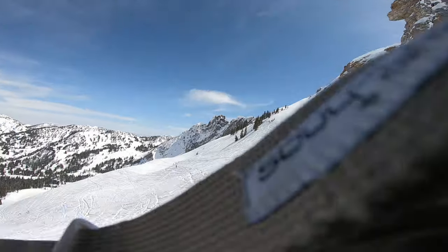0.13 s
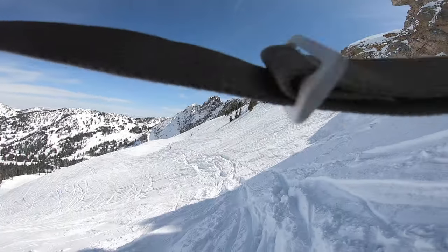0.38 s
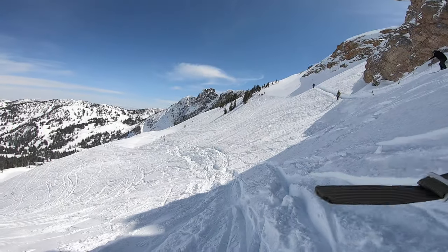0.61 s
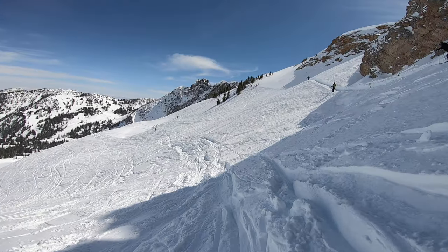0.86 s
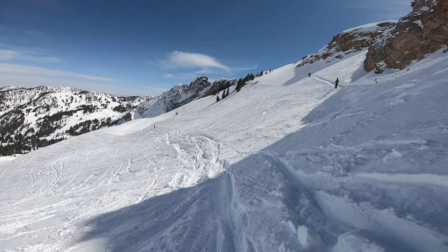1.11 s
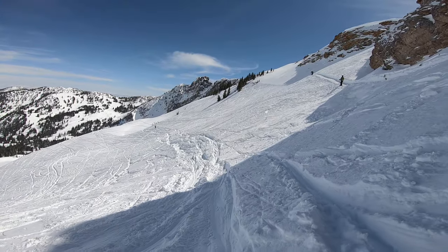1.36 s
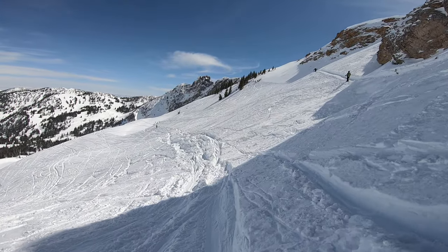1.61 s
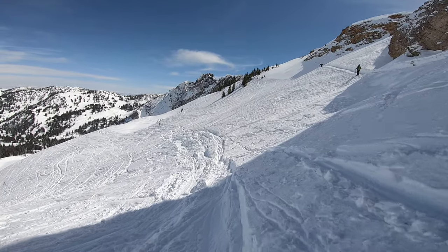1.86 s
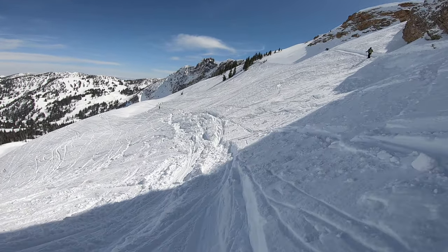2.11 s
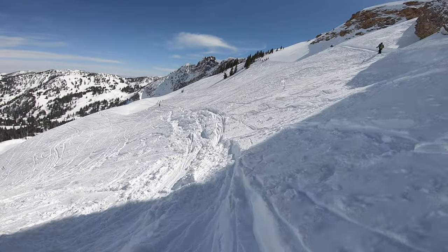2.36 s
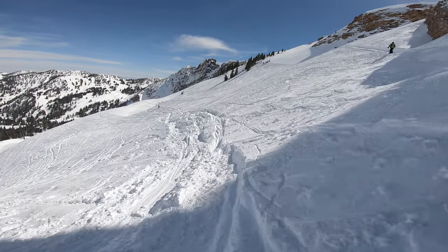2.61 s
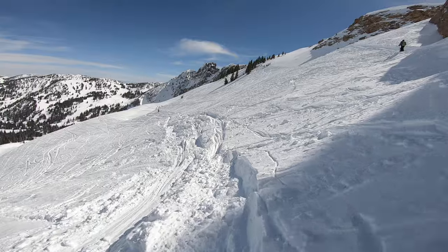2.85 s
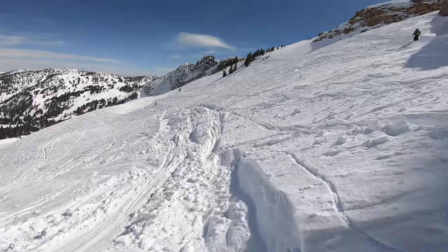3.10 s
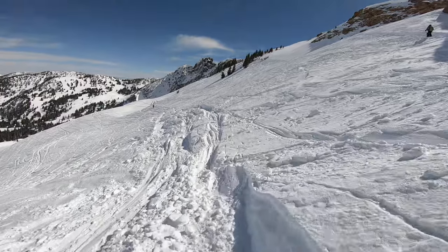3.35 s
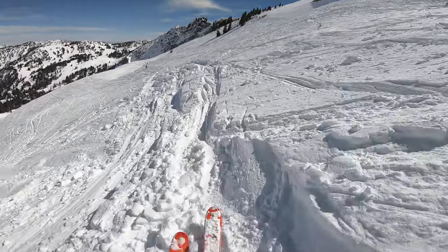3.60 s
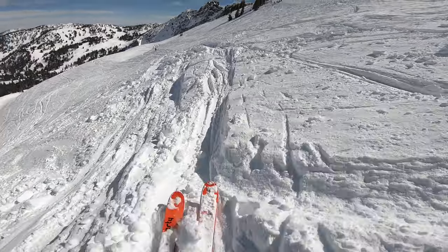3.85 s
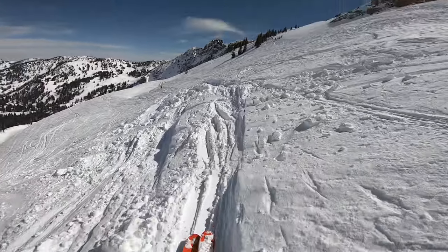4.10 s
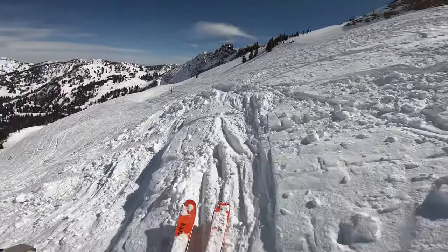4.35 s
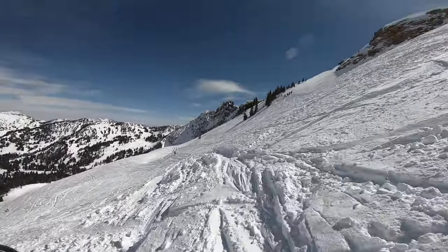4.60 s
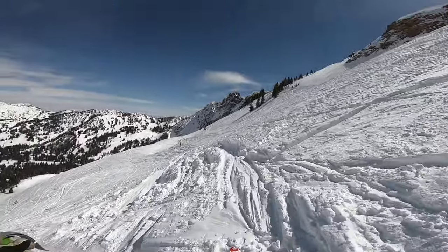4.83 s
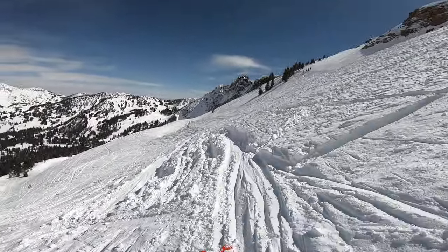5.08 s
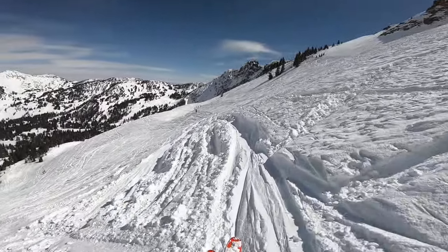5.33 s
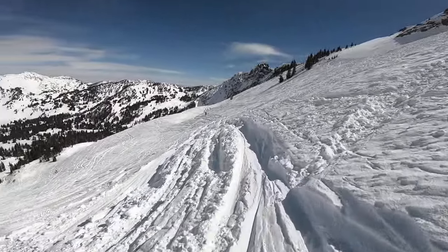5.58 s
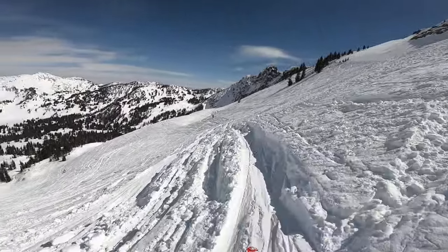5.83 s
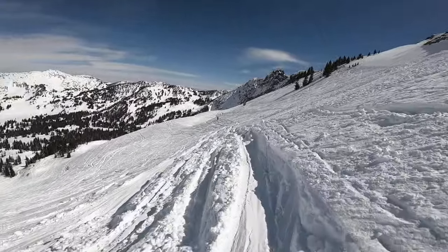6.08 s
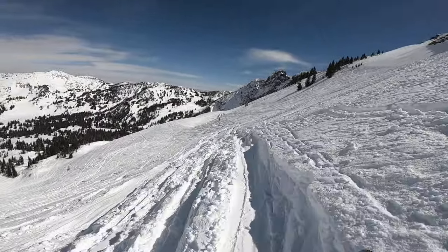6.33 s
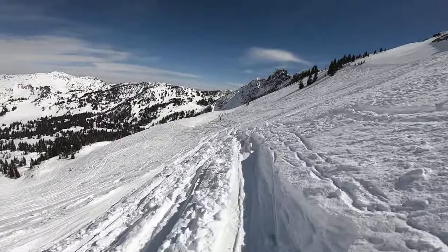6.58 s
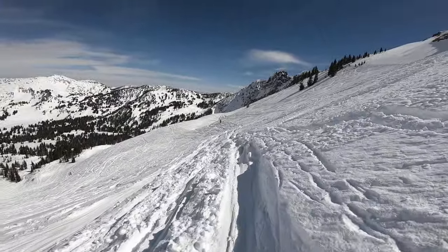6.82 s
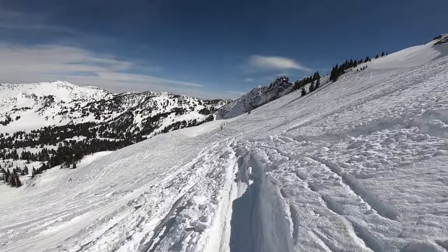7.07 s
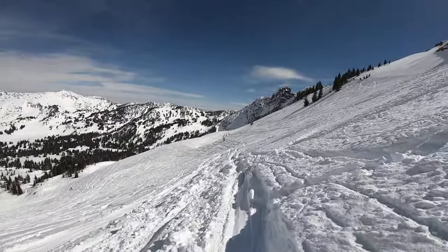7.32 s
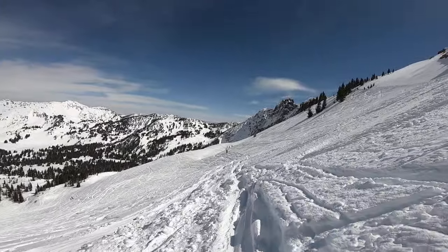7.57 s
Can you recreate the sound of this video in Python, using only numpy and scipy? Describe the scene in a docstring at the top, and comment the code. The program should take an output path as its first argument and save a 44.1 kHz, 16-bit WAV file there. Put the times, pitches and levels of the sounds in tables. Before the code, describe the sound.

Body-worn camera on a skier outdoors: a half-second burst of loud low thumps, gritty rubbing and hard clacks, cut off as the hand leaves. Then a near hush with soft snow hiss and a faint airy whistle. The sliding gets rougher and wider; a sharp knock comes before four seconds and a deep thud with crunching snow after it. Softer scraping, small knocks, cloth swishes and wind puffs follow.

```python
"""Skis slide through chopped snow, heard at a small camera worn by the skier: flickering noise and grains.
At first a gloved hand shoves and scrapes the case in stick-slip grains, until it lets go.
Gusts buffet the case and clothing swishes: coloured noise under swelling levels.
Knocks ring the hollow housing, bumps are damped low swings, a buckle rings its modes.
Two narrow noise bands whistle faintly; the nearly mono start widens to stereo."""
import sys
import numpy as np
from scipy import signal
from scipy.fft import rfft, irfft, next_fast_len
from scipy.io import wavfile
from scipy.ndimage import uniform_filter1d

SR = 44100
rng = np.random.default_rng(int(sys.argv[2]) if len(sys.argv) > 2 else 0)


def to_wav(sig):
    """Store sig (one row per channel, or 1-D mono) as 16-bit WAV at the path in sys.argv[1].

    Samples outside -1..1 are clipped; the rate is SR.
    """
    pcm = np.clip(np.atleast_2d(sig), -1, 1) * 32767
    pcm = np.round(pcm).astype(np.int16)
    wavfile.write(sys.argv[1], SR, pcm.T)  # frames by channels


def gain_from_decibels(decibels):
    """Convert decibel values to linear amplitude factors."""
    exponent = np.asarray(decibels, float) / 20
    return 10 ** exponent


N = 339282
SEC = np.arange(N) / SR
SIZE = next_fast_len(N)
HZ = np.maximum(np.arange(SIZE // 2 + 1) * SR / SIZE, 1)
SIDES = np.array([[1], [-1]])  # sign of the side signal in left and right

# Resonances of the hollow case. Each row: frequency in Hz, relative level in dB, t60 in seconds.
HOUSING_MODES = [(680, -7.5, .04), (1505, 5, 0.012), (1660, 5, 0.0085), (1910, 1, 0.013), (2220, 0.5, 0.01),
                 (2780, -2.5, .012), (3250, -5, 0.008), (4420, -10.5, 0.0065), (7130, -13, 0.013),
                 (8770, -13.5, 0.012)]
# Stereo spread of the ride, before the width gain. Each row: frequency in Hz, side minus mid in dB.
SIDE_OVER_MID = [(60, -11.5), (220, -14.5), (400, -2), (900, 4.5), (2200, -9.5), (3500, -7), (4500, 4),
                 (12000, 0.5)]
# Stereo width, nearly mono at first. Each row: time in seconds, side gain in dB.
STEREO_WIDTH = [(0, -39.5), (2.15, -48.5), (2.3, -19.5), (2.6, -6.5), (3.3, 0), (7.7, 2.5)]


def along(table):
    """Columns of a time table, one value a sample; -150 outside it."""
    s, *columns = np.transpose(table)
    return [np.interp(SEC, s, c, -150, -150) for c in columns]


def over_hz(table, hz):
    """A spectrum table read on a log axis."""
    f, db = np.transpose(table)
    return np.interp(np.log(hz), np.log(f), db)


def walk(rate_hz):
    """Random levels held 1 / rate_hz s and slewed twice; spread near 1.5."""
    k = int(SR / rate_hz)
    held = np.repeat(rng.standard_normal(N // k + 1), k)
    return 1.97 * uniform_filter1d(uniform_filter1d(held, k), k)[:N]


def swells(s, db, fade_ms, shape=1.2, stop=1):
    """Level in dB of events that grow to a peak and fade; their powers add.

    shape: 1 = pointed peak, 2 = round top with steep flanks; stop: fade time over build-up time.
    """
    power = 0
    for at, peak_db, ms in zip(s, db, fade_ms):
        distance = np.abs(SEC - at) * 1000 / max(ms, 5) / np.where(SEC > at, stop, 1)
        power = power + gain_from_decibels(2 * (peak_db - 10 * distance ** shape))
    return 10 * np.log10(power + 1e-15)


def join(a_db, b_db):
    """Level of two unrelated parts together."""
    return 10 * np.log10(gain_from_decibels(2 * a_db) + gain_from_decibels(2 * b_db))


def grit(per_s, spread_db, share):
    """Smooth noise plus single grains of very uneven size; share = amplitude share of the grains."""
    draw = rng.random((3, N))
    hits = draw[0] < per_s / SR
    grains = hits * np.sign(draw[1] - .5) * gain_from_decibels(-spread_db * np.log(1 - draw[2]))
    share = np.clip(share, 0, 1)
    return share * grains / grains.std() + np.sqrt(1 - share ** 2) * rng.standard_normal(N)


def texture(excite, colour, side, flicker_db, rate_hz, shared_db, body=1, count=2):
    """Excitation coloured in bands, count to the octave, that flicker alone and together; mid rms 1."""
    f = np.array(colour)[:, 0]
    gain = body * gain_from_decibels(over_hz(colour, HZ)) * (HZ > f[0]) * (HZ < f[-1])
    mid = rfft(excite(), SIZE) * gain
    apart = rfft(excite(), SIZE) * gain * gain_from_decibels(over_hz(side, HZ))
    pair = np.array([mid, apart])
    out, together = 0, shared_db * walk(rate_hz)
    for centre in np.arange(np.log2(f[0]), np.log2(f[-1]) + 1 / count, 1 / count):
        mask = np.clip(1 - count * np.abs(np.log2(HZ) - centre), 0, 1)
        band = irfft(pair * mask, SIZE)[:, :N]
        out = out + band * gain_from_decibels(together + flicker_db * walk(rate_hz))
    return (out[0] + SIDES * out[1]) / out[0].std()


def housing(hz):
    """Gain of the hollow case at each frequency: the sum of its resonances."""
    modes = (gain_from_decibels(db) / (1 + 1j * (hz - f) * 2 * np.pi * t60 / np.log(1000)) for f, db, t60 in HOUSING_MODES)
    return np.abs(sum(modes))


def slide():
    """Skis hiss on even snow and dig into rough patches, which jolt the mount and break lumps."""
    # Skis on even snow. Each row: time in seconds, hiss in dB.
    glide_rows = [(.48, -58), (.53, -76), (.85, -72.5), (1.05, -72), (1.5, -68), (1.85, -62), (2.9, -62.5),
                  (3.3, -61), (3.9, -52.5), (4.1, -57.5), (5.2, -61.5), (5.4, -55), (6.1, -59.5),
                  (6.8, -54.5), (7.08, -59.5), (7.35, -54.5), (7.7, -68)]
    # Rough patches. Each row: peak in seconds, hiss in dB, mount jolt in dB, ms to build up by 10 dB.
    patch_rows = [(.48, -55, -44.5, 15.5), (.92, -71.5, -64, 103), (1.169, -74, -55, 85),
                  (1.662, -66.5, -50, 90), (1.78, -57, -51.5, 72), (1.95, -58.5, -52, 102),
                  (2.17, -54.5, -48.5, 141), (2.4, -62, -59, 158), (2.85, -71, -54, 222),
                  (3.06, -52.5, -48, 137), (3.189, -51.5, -59.5, 71), (3.43, -60, -55, 76),
                  (3.52, -53.5, -48.5, 86), (3.692, -42.5, -37, 87.5), (4.028, -51.5, -43.5, 57),
                  (4.19, -47, -44, 72), (4.29, -42.5, -46.5, 51), (4.363, -33.5, -30.5, 52),
                  (4.446, -40, -36, 30), (4.569, -42.5, -45, 37), (4.78, -52, -48, 87),
                  (5.053, -47.5, -49.5, 83), (5.16, -45.5, -44, 34), (5.32, -56.5, -65, 87),
                  (5.53, -73, -51, 108), (5.95, -54.5, -57, 100), (6.12, -57, -63, 70),
                  (6.311, -55.5, -54, 49), (6.48, -70.5, -54, 58), (6.7, -59, -58, 152),
                  (7.39, -52.5, -50, 68), (7.57, -46, -46.5, 191)]
    # Ski hiss before its tilt. Each row: frequency in Hz, relative level in dB per Hz.
    ski_colour = [(800, -8.5), (1070, -17), (1370, 1.5), (1700, 0.5), (2150, -0.5), (2700, -8.5),
                  (3300, -13), (3800, -28), (4600, -28.5), (7000, -39.5)]
    # Shaken mount. Each row: frequency in Hz, relative level in dB per Hz.
    mount_colour = [(80, -17.5), (110, -8), (183, 3), (208, -0.5), (337, -20), (470, -17.5), (590, -16.5),
                    (680, -10), (910, -25), (1200, -27)]
    # Breaking lumps before the housing rings. Each row: frequency in Hz, relative level in dB per Hz.
    crunch_colour = [(400, -4), (700, 1), (1400, 3), (3000, -17)]
    dig_tilt_db, glide_tilt_db = -2, 1  # per octave: rough patches duller, even snow brighter
    tremble_db, tremble_slope = -66.5, 0.3  # level at -61.5 dB of hiss, dB per dB

    glide_db = along(glide_rows)[0]
    s, dig_db, shake_db, fade_ms = np.transpose(patch_rows)
    # a dig holds its level, then stops in 0.76 of its build-up time
    dig_db = swells(s, dig_db, fade_ms, shape=1.6, stop=0.76)
    ski_db = join(glide_db, dig_db)
    jolt_db = join(tremble_db + tremble_slope * (glide_db + 61.5), swells(s, shake_db, fade_ms))
    # lumps break where the skis both dig in and jolt
    crunch_db = (jolt_db + ski_db) / 2 - 7

    octaves = np.log2(HZ / 1000)
    mount = texture(lambda: grit(400, 2.5, 0.71), mount_colour, SIDE_OVER_MID, 1.8, 25, 0.69)
    dig = texture(lambda: grit(1500, 2.4, .55), ski_colour, SIDE_OVER_MID, 1.8, 30, 1.5,
                  gain_from_decibels(dig_tilt_db * octaves), count=4)
    glide = texture(lambda: grit(1500, 2.02, .45), ski_colour, SIDE_OVER_MID, 1.3, 16, 0.93,
                    gain_from_decibels(glide_tilt_db * octaves), count=3)
    crunch = texture(lambda: grit(350, 2.1, .9), crunch_colour, SIDE_OVER_MID, 2.5, 40, 2.4, housing(HZ))
    return gain_from_decibels(jolt_db) * mount + gain_from_decibels(dig_db) * dig + gain_from_decibels(glide_db) * glide + gain_from_decibels(crunch_db) * crunch


def hand():
    """The glove pushes the case and scrapes it in stick-slip grains, stroke by stroke."""
    # Shoves before soft limiting. Each row: peak in seconds, level in dB, ms to rise or fade by 10 dB.
    shove_rows = [(0, -16.5, 27), (0.052, -9.5, 30.5), (.13, -18, 66), (.28, -10.5, 35), (.34, -18.5, 60),
                  (0.395, -11, 29.5), (0.436, -6.5, 30)]
    # Strokes that build until the glove slips. Each row: slip in seconds, level in dB, build-up in ms (sigma).
    stroke_rows = [(.003, -28, 27), (0.112, -36.5, 28), (0.17, -35.5, 17), (0.231, -37.5, 19),
                   (0.289, -16.5, 14.1), (0.334, -25, 7.6), (0.374, -39, 36), (0.426, -26, 13)]
    # Push. Each row: frequency in Hz, relative level in dB per Hz.
    push_colour = [(16, -2.5), (22, 4), (41, 0), (108, -9.5), (140, -10), (260, -22), (600, -39.5)]
    # Scrape before the housing rings. Each row: frequency in Hz, relative level in dB per Hz.
    scrape_colour = [(300, -2.5), (1400, 1), (3500, -1.5), (6500, -9), (9000, -12.5), (15000, -29.5)]
    let_go_s, let_go_db_per_s = .437, 1696.5  # the hand leaves the case
    rub_db = -38.5  # the glove keeps rubbing between strokes
    soft_limit = .55  # rounds off the loudest peaks of the shoves
    mono = [(20, -40), (500, -40)]  # Hz, side minus mid dB

    push = texture(lambda: grit(150, 0.93, 0.63), push_colour, mono, 1.5, 40, 1.0)
    scrape = texture(lambda: grit(700, 2.2, 0.9), scrape_colour, mono, 2.1, 50.46, 2.2, housing(HZ))
    let_go_db = let_go_db_per_s * np.maximum(SEC - let_go_s, 0)
    strokes = gain_from_decibels(rub_db - let_go_db)
    for s, db, ms in stroke_rows:
        # the grip lets go faster than it builds
        distance = (SEC - s) * 1000 / ms / np.where(SEC > s, .4, 1)
        strokes = strokes + gain_from_decibels(db) * np.exp(-.5 * distance ** 2)
    push_db = swells(*np.transpose(shove_rows)) - let_go_db
    return soft_limit * np.tanh(gain_from_decibels(push_db) * push / soft_limit) + strokes * scrape


def knocks():
    """Each contact is a few ms of rattle that rings the housing modes nearest its own pitch."""
    # Knocks and ticks. Each row: start in seconds, mid peak in dB before panning,
    # centre in octaves above 1 kHz, contact in ms (sigma).
    knock_rows = [(.093, -32, .5, 7), (.169, -22, 0.98, 1.6), (0.237, -14, 0.2, 2.1),
                  (0.2761, -16, 1.22, 5.4), (0.2932, -1.5, 1.06, 1.14), (.328, -12, 0.24, 4),
                  (0.3379, -3.5, 0.8, 3.3), (0.426, -15.5, 1.81, 1.44), (0.5494, -53, 1.45, 1.42),
                  (.821, -53.5, 0.9, 1.6), (0.9252, -51.5, 2, 1.6), (.975, -54, 1.16, 1.54),
                  (1.153, -47, 0.1, 7.3), (1.652, -43.5, -0.1, 9.1), (2.946, -43, 1.07, 4.5),
                  (3.316, -41.5, 2.5, 0.72), (3.6443, -12.5, 1.48, 1.8), (3.994, -39, 1, 8.8),
                  (4.0451, -39, -0.7, 6.9), (4.0745, -33, 0.23, 5.1), (4.116, -42, -.5, 10),
                  (4.2848, -26.5, 1.13, 1.7), (4.328, -29.5, -1, 21), (4.3344, -12.5, 0.49, 2.3),
                  (4.367, -19, 0.74, 12), (4.544, -40.5, 1.6, 3.4), (4.7238, -51, 2.5, 1),
                  (5.051, -42.5, -1, 16), (5.128, -35.5, 0.34, 11), (5.327, -45.5, 2, 2.1),
                  (5.527, -33.5, 0.84, 1.1), (5.745, -39.5, 1.5, 0.93), (6.034, -43, 1.2, 2),
                  (6.093, -37.5, 0.9, 2.4), (6.3676, -40.5, 1.5, 1.3), (6.409, -42, 1.5, 1.2),
                  (6.4645, -39, 1.27, 0.96), (6.6011, -23.5, 1.1, 4), (7.211, -41, .5, 2.2),
                  (7.345, -44, 0.96, 4)]
    pole_s, pole_right_db = (3.64, 6.6), 4.5  # two pole knocks from the right: dB by which right leads
    apart = .55  # gain of the part that differs between the ports

    out, t = np.zeros((2, N + 8192)), SEC[:2048]
    hz, db, t60 = np.transpose(HOUSING_MODES)[:, :, None]
    # modes die in 0.66 of their t60 here
    rings = np.exp(-np.log(1000) * t / (0.66 * t60)) * np.sin(2 * np.pi * hz * t)
    for s, peak_db, octave, contact_ms in knock_rows:
        ring = np.sum(gain_from_decibels(db - 43 * (np.log2(hz / 1000) - octave) ** 2) * rings, axis=0)
        contact = np.exp(-(t[:1024] * 1000 / max(contact_ms, .2)) ** 2 / 2)
        rattle = rng.standard_normal((2, 1024)) * contact
        edges_hz = np.clip(1000 * 2 ** octave * np.array([.42, 1.9]), 250, 13000)
        rattle = signal.sosfilt(signal.butter(3, edges_hz, "band", fs=SR, output="sos"), rattle)
        mid, side = (np.convolve(ring, r) for r in rattle)
        right_db = pole_right_db * (np.abs(s - np.array(pole_s)).min() < .02)
        both = (mid + apart * SIDES * side) * gain_from_decibels(peak_db - SIDES * right_db / 2) / np.abs(mid).max()
        start = int(s * SR)
        out[:, start:start + len(mid)] += both
    return out[:, :N]


def bumps():
    """A heave of the case: one damped low swing that builds up over its first cycle."""
    # Each row: start in seconds, level in dB before build-up and decay, swing in Hz, t60 in seconds.
    bump_rows = [(0.239, -6, 60, 0.053), (0.341, -12, 88, 0.038), (0.424, -19, 82.4, 0.0584),
                 (4.322, -2, 28.36, 0.21), (4.333, -14, 91, 0.13), (4.49, -30.5, 33.4, 0.19),
                 (6.022, -24, 40.5, 0.089)]
    out = np.zeros(N)
    for s, db, hz, t60 in bump_rows:
        t = np.maximum(SEC - s, 0)
        build = 1 - np.exp(-(t * hz * 2.0) ** 2)
        decay = np.exp(-np.log(1000) * t / t60)
        out += gain_from_decibels(db) * np.sin(2 * np.pi * hz * t) * build * decay
    return out


def buckle():
    """A strap buckle flicked against the case: each flick rings its modes."""
    # Buckle modes. Each row: frequency in Hz, relative level in dB, t60 in seconds.
    mode_rows = [(1377, 0, 0.051), (2310, -4, 0.055), (3520, -10.5, 0.092)]
    # Flicks. Each row: start in seconds, level in dB.
    flick_rows = [(.004, -26), (.341, -27.5), (.433, -36.5)]
    hz, db, t60 = np.transpose(mode_rows)[:, :, None]
    t = SEC[:SR // 2]
    ring = np.sum(gain_from_decibels(db - 60 * t / t60) * np.sin(2 * np.pi * hz * t), axis=0)
    out = np.zeros(N)
    for s, flick_db in flick_rows:
        start = int(s * SR)
        out[start:start + len(t)] += gain_from_decibels(flick_db) * ring
    return out


def buffeting():
    """Wind on the case: low, grainy noise that swells with each gust."""
    # Gusts. Each row: peak in seconds, level in dB, ms to rise or fade by 10 dB.
    gust_rows = [(.48, -45, 60), (1.181, -47, 66), (1.57, -45.5, 69), (2.23, -42.5, 305), (2.7, -44.5, 300),
                 (3.06, -35.5, 137), (3.19, -34.5, 53), (3.7, -32, 80), (3.84, -37, 104), (4.15, -39, 149),
                 (4.45, -29, 87), (4.76, -37, 101), (5.25, -43, 157), (5.42, -44, 106), (5.67, -43.5, 123),
                 (6.07, -47, 83), (6.401, -38, 41), (7.09, -46, 82), (7.38, -39, 50.5)]
    # Each row: frequency in Hz, relative level in dB per Hz.
    buffet_colour = [(14, 2.5), (20, -2.5), (40, -6.5), (75, -21), (130, -32)]
    calm_db = -65  # steady air between gusts
    buffet = texture(lambda: grit(27, 6.2, 0.66), buffet_colour, SIDE_OVER_MID, 2.0, 14, 1.8)
    return gain_from_decibels(join(calm_db, swells(*np.transpose(gust_rows)))) * buffet


def clothing():
    """Cloth rubbing as the skier moves: bright, fine-grained noise in slow swells."""
    # Swishes. Each row: peak in seconds, level in dB, ms to rise or fade by 10 dB.
    swish_rows = [(.91, -84, 120.5), (2.17, -71, 199), (2.55, -71, 302), (3.08, -68, 279),
                  (3.66, -61.5, 115), (3.93, -65, 222.5), (4.35, -58, 76.5), (4.74, -70, 100),
                  (5.01, -69.5, 129.5), (5.38, -71.5, 174.5), (5.65, -72, 250.5), (5.92, -71.5, 173.5),
                  (6.401, -70, 141.5), (6.86, -73, 247), (7.36, -73, 255)]
    # Each row: frequency in Hz, relative level in dB per Hz.
    swish_colour = [(3300, 9.5), (4500, -7), (6300, -8.5), (7500, -5.5), (8600, -7), (9500, -19),
                    (11000, -26), (14000, -29.5)]
    still_db = -87  # faint steady hiss between swishes
    swish = texture(lambda: grit(3000, 2.5, .4), swish_colour, SIDE_OVER_MID, 1.2, 30, 1.2)
    return gain_from_decibels(join(still_db, swells(*np.transpose(swish_rows)))) * swish


def whistle():
    """Air whistling faintly past an edge: two narrow, breathy noise bands."""
    # Each row: time in seconds, mid level in dB.
    whistle_rows = [(.5, -78), (1.3, -71.5), (2.1, -68.5), (2.16, -85)]
    centres_hz, width_hz = (2250, 2330), 67  # a close pair; width at -6 dB
    band = sum(1 / (1 + (2 * (HZ - hz) / width_hz) ** 4) for hz in centres_hz)
    air = irfft(rfft(rng.standard_normal((2, N)), SIZE) * band, SIZE)[:, :N]
    return gain_from_decibels(along(whistle_rows)[0]) * (air[0] + .5 * SIDES * air[1]) / air[0].std()


def hollow(moving):
    """While the sound is mono, the summed ports lose a band."""
    centre_hz, width_hz, depth = 1930, 390, 0.55
    edges_hz = centre_hz + width_hz / 2 * np.array([-1, 1])
    lost = signal.sosfiltfilt(signal.butter(2, edges_hz, "band", fs=SR, output="sos"), moving)
    narrowness = np.clip(1 - gain_from_decibels(along(STEREO_WIDTH)[0]), 0, 1)
    return moving - depth * narrowness * lost


def scene():
    """Everything that reaches the two ports."""
    moving = hollow(slide() + buffeting() + clothing())
    return hand() + moving + knocks() + bumps() + buckle() + whistle()


def roll_off(x):
    """The treble ends steeply here."""
    return signal.sosfilt(signal.butter(12, 14500, fs=SR, output="sos"), x)


def record(dry):
    """Stereo fades in by a gain on the side signal; tanh rounds off the loudest peaks."""
    mid = dry.mean(axis=0)
    wet = mid + gain_from_decibels(along(STEREO_WIDTH)[0]) * (dry - mid)
    return roll_off(np.tanh(.8 * wet) / .75)


dry = scene()
out = record(dry)
to_wav(out)
```